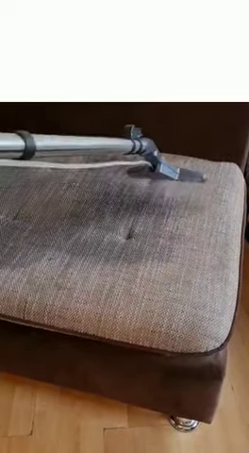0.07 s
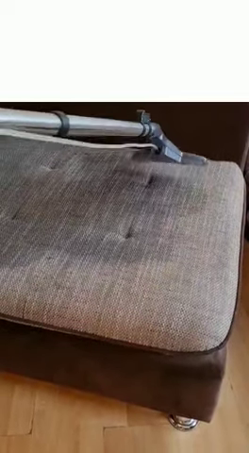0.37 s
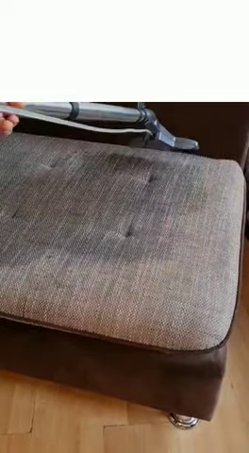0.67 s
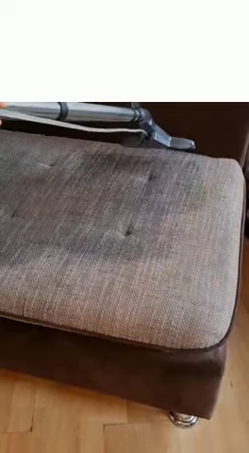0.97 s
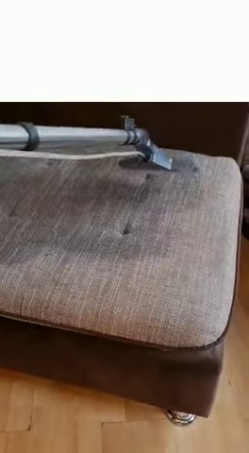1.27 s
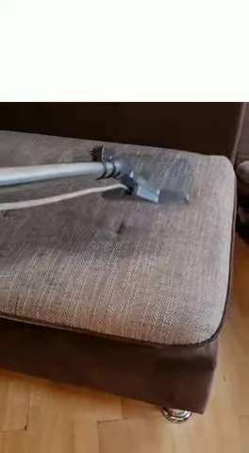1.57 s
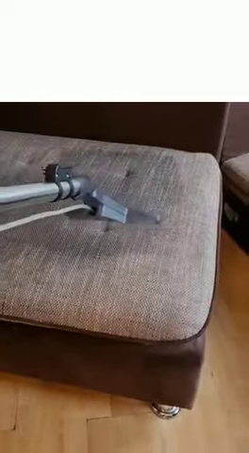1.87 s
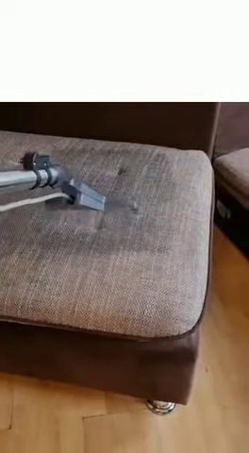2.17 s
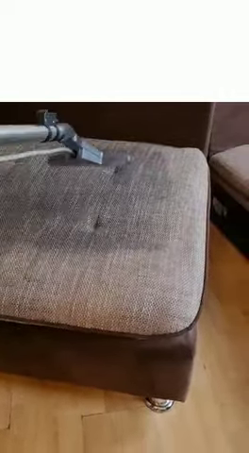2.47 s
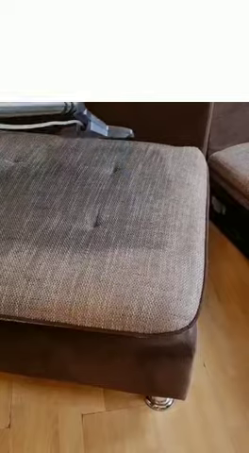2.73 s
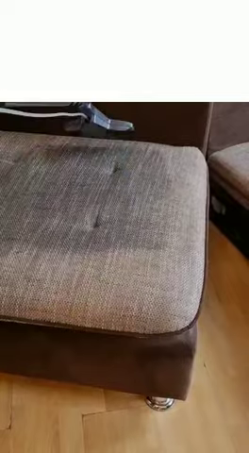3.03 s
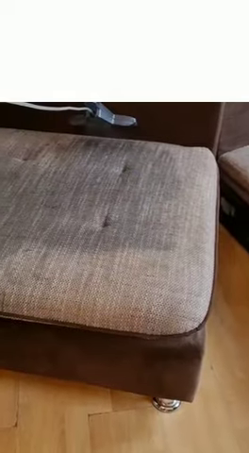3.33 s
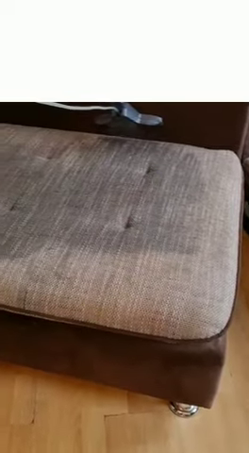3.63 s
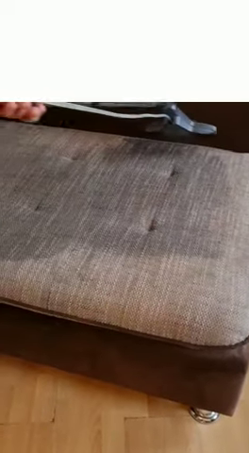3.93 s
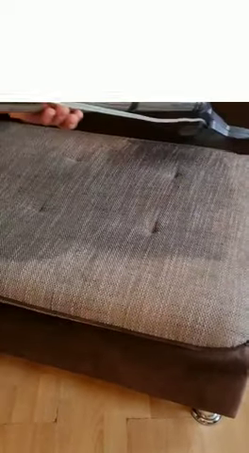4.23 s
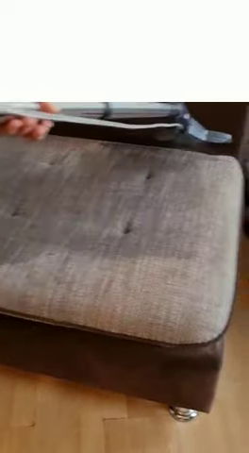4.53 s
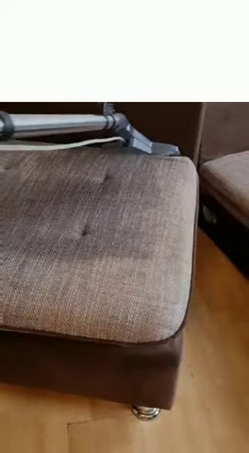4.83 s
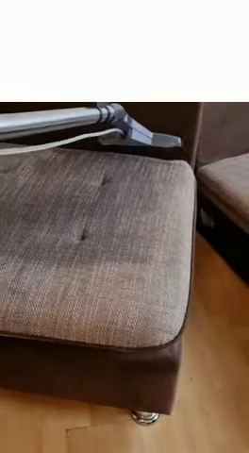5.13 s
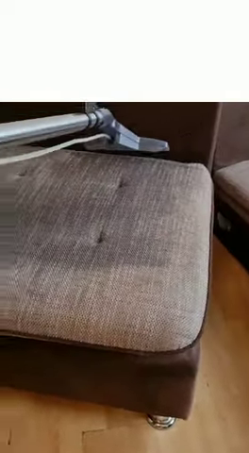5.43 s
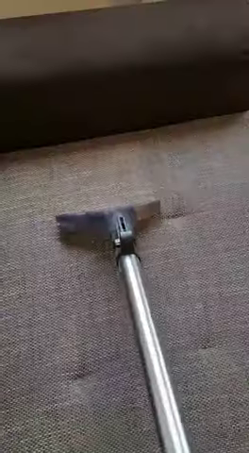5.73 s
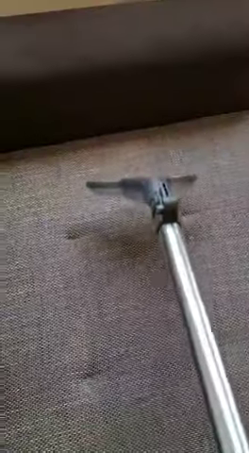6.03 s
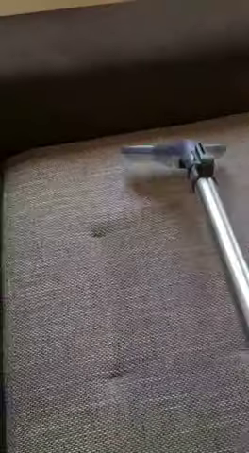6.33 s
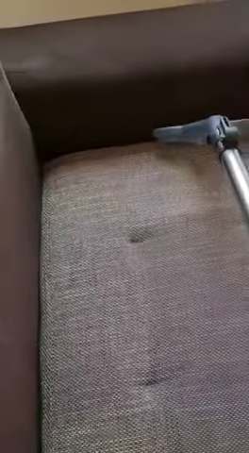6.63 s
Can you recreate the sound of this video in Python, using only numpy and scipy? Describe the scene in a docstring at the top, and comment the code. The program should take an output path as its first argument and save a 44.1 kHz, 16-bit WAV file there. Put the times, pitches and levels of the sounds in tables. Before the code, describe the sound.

A buzzing pump and hissing, spitting water spray die away, a plastic wand clicks, and louder vacuum suction starts on wet fabric.

```python
"""Wet-cleaning a sofa

A spray-extraction cleaner in a small room, heard on a pair of microphones. Its mains-driven piston
pump buzzes while the nozzle sprays and spits; the buzz dies away and the wand clicks twice, then
once faintly. After an instant of silence the suction motor is running: it whines, sags in speed as
the nozzle grips, and draws air through the wet fabric."""
import sys
import numpy as np
from scipy import signal
from scipy.fft import rfft, irfft
from scipy.io import wavfile

SR = 44100
rng = np.random.default_rng(int(sys.argv[2]) if len(sys.argv) > 2 else 0)


def dump_mix(stems):
    """Bounce the given channels to the path in sys.argv[1] as a 16-bit WAV at rate SR."""
    frames = np.atleast_2d(stems).T  # one column per channel
    limited = np.clip(frames, -1, 1)  # hard clip at full scale
    pcm = np.round(limited * 32767).astype(np.int16)
    wavfile.write(sys.argv[1], SR, pcm)


N = 299880
TIME, BINS = np.arange(N) / SR, np.fft.rfftfreq(N, 1 / SR)
MAINS_HZ = 50.015  # one piston stroke a cycle
SPRAY_OFF_S, PUMP_OFF_S = 4.995, 5.025  # the spray loses its pressure first

# Water rushing in hose and nozzle. Each row: frequency in Hz, relative density in dB.
FLOW = [(15, -60), (25, -27), (45, -21), (70, -19), (110, -16), (160, -17.5), (220, -13.5), (400, -15.5),
        (560, -16.5), (900, -18.5), (1500, -16), (2700, -18), (3400, -15.5), (3800, -19), (4500, -30.5),
        (5850, -69), (9900, -110)]
# Mist leaving the nozzle. Each row: frequency in Hz, relative density in dB.
MIST = [(2530, -15.5), (4300, -4), (5810, -2), (6500, 1), (7040, 1), (7930, 2.5), (10900, -5.5),
        (13800, -5), (14600, -17), (15500, -20)]
# Large air bubbles spat from the nozzle. Each row: start in seconds, level in dB.
SPITS = [(0.7272, -32.5), (0.9677, -35), (1.2271, -37), (2.0517, -30.5), (2.1124, -23.5), (2.1254, -36),
         (2.6973, -33), (3.0174, -33), (3.1906, -39), (3.3483, -38), (3.6331, -35), (3.7105, -38),
         (4.3535, -40)]
# How alike the two microphones hear the room. Each row: frequency in Hz, correlation.
COHERENCE = [(60, 1), (110, .997), (200, .86), (300, .7), (640, .2), (1410, -.28), (3100, .12), (6820, 0),
             (15000, 0)]
# Stereo balance while spraying. Each row: frequency in Hz, left minus right in dB.
SPRAY_BALANCE = [(60, -2), (110, 3.5), (200, 3), (380, -5.5), (700, -0.5), (1290, -4.5), (2380, -3),
                 (4400, 0), (8120, 0.5), (15000, -1.5)]


def pump(strokes):
    """The piston shakes the housing: throb, hum, a higher drone, buzzing panels and an uneven rattle."""
    # Pump harmonics. Each row: multiple of the stroke rate, relative level left and right in dB.
    harmonics = [(1, -70, -75), (2, -39.5, -39.0), (3, -61, -64.5), (4, -48.5, -49.5), (5, -54.5, -48.5),
                 (6, -54, -47), (7, -66.5, -55.5), (8, -51, -48), (9, -76, -74), (10, -50.5, -47.5),
                 (11, -49, -43.5), (12, -45.5, -49), (13, -53.5, -53), (14, -73, -54.5), (15, -67, -51),
                 (16, -53, -55.5)]
    # Panels buzzing on the nearest harmonic. Each row: pitch in Hz, relative level left and right in dB.
    panel_modes = [(850, -55, -72), (1000, -54, -53), (1050, -61, -55.5), (1100, -76, -64),
                   (1250, -66, -68), (1300, -60, -54), (1400, -58, -60), (1500, -55, -54.5),
                   (1550, -51.5, -53), (1600, -53.5, -52), (1650, -59, -59), (1700, -62, -66),
                   (2050, -73, -55), (2150, -65, -62), (2300, -56.5, -58.5), (2350, -68, -60),
                   (2950, -63, -56), (3000, -61, -59), (3104, -68, -56), (3290, -76, -56), (3337, -54, -52),
                   (3649, -66, -62), (3699, -58.5, -53.5)]
    # The piston's rattle. Each row: frequency in Hz, relative level in dB.
    rattle_spectrum = [(800, 8), (1100, -7), (1600, -9), (2200, 3), (2650, -5.5), (3300, 4), (3750, -7.5),
                       (4000, -12), (4500, -17), (6600, -10.5), (8000, -21), (9000, -19)]
    orders, sides_db = np.arange(len(harmonics)) + 1, np.transpose(harmonics)[1:]
    low, high = orders <= 2, orders >= 9
    mid = ~low & ~high
    throb = stroke_tones(strokes, orders[low], sides_db[:, low], strike=0.675, scatter=0, wander=0)
    hum = stroke_tones(strokes, orders[mid], sides_db[:, mid], strike=0.5994, scatter=1, wander=0.017)
    drone = stroke_tones(strokes, orders[high], sides_db[:, high], strike=.75, scatter=1.37, wander=0.22)
    panel_hz, *panel_db = np.transpose(panel_modes)
    panel_orders = np.round(panel_hz / MAINS_HZ).astype(int)
    panels = stroke_tones(strokes, panel_orders, panel_db, strike=.5, scatter=0.47, wander=0.12)
    rattle_orders = np.setdiff1d(np.arange(len(harmonics) + 1, 180), panel_orders)
    rattle_db = at_hz(rattle_spectrum, rattle_orders * MAINS_HZ)
    jittered = strokes + 0.00059 * drift(hz=40)
    rattle = stroke_tones(jittered, rattle_orders, rattle_db, strike=.36, scatter=0.66, wander=0.21)
    drone += gain_of(-8.5) * valve_chatter()
    swell_db = 2 * np.exp(-((TIME - 4.07) / 0.41) ** 2)
    return (run_down(db=-38.5 + .3 * drift(hz=1.2), t60=.28) * throb
            + run_down(db=-42, t60=0.35) * hum
            + run_down(db=-46 + swell_db, t60=0.55) * drone
            + run_down(db=-47.5 + 0.41 * drift(hz=12), t60=0.35) * panels
            + run_down(db=-52 + drift(hz=25), t60=0.3) * rattle)


def stroke_tones(strokes, orders, level_db, strike, scatter, wander):
    """Harmonics of one blow a stroke, `strike` of the way through; reflections scatter the upper ones."""
    size = 4096  # samples in one cycle
    reflected = np.log(np.maximum(orders / 2, 1))
    mic_angle = np.arccos(at_hz(COHERENCE, orders * MAINS_HZ)) * rng.choice([-1, 1], len(orders))
    phase = scatter * reflected * rng.standard_normal(len(orders)) + np.outer([.5, -.5], mic_angle)
    direct = np.exp(1j * (phase - 2 * np.pi * orders * strike))
    blend = drift(hz=0.53)  # one set of reflections gives way to another as the microphones move
    echoes = reflected * np.exp(2j * np.pi * rng.random((2, 2, len(orders))))
    paths = [(direct, 1), (echoes[0], wander * np.cos(blend)), (echoes[1], wander * np.sin(blend))]
    tones = np.zeros((2, N))
    for path, weight in paths:
        lines = np.zeros((2, size // 2 + 1), complex)
        lines[:, orders] = gain_of(level_db) * path
        for channel, cycle in zip(tones, irfft(lines)):
            channel += weight * np.interp(strokes % 1 * size, np.arange(size), cycle)
    return unit_rms(tones)


def valve_chatter():
    """The valve chatters on every other stroke, sounding between the pump's harmonics."""
    # Valve tones. Each row: pitch in Hz, relative level in dB.
    partials = [(225, -66), (475, -61.5), (525, -68), (675, -70), (725, -61.5), (775, -71.5), (1125, -67.5),
                (1175, -66)]
    chatter = np.zeros((2, N))
    for hz, db in partials:
        level = gain_of(db + 0.96 * drift(hz=3.6))
        chatter += level * np.cos(2 * np.pi * hz * TIME + rng.normal(0, 1, (2, 1)))
    return unit_rms(chatter)


def spray(strokes):
    """Each stroke pushes two surges of water through the hose and out as mist and droplets."""
    # Spray strength as the nozzle moves. Each row: time in seconds, dB above the usual.
    strength = [(0.1, -0.1), (1.4, 0), (1.85, -1.8), (2.2, 1.3), (3.0, 1.1), (3.4, -2), (4.0, -0.3),
                (4.8, -1)]
    # Hollow tones of the jet. Each row: pitch in Hz, level in dB.
    jet_tones = [(1320, -59), (1590, -57.5), (2200, -56.5)]
    push_db, = curves(strength)
    long_surge = 0.83 * np.exp(-((strokes - .34) % 1) / 0.1)
    short_surge = 0.52 * np.exp(-((strokes - .66) % 1) / 0.017)
    flow = run_down(db=-46.5 + 0.35 * push_db, t60=0.51) * noise(at_hz(FLOW, BINS), SPRAY_BALANCE)
    for hz, db in jet_tones:
        jet = noise(-130 * np.log2((BINS + 1) / hz) ** 2, SPRAY_BALANCE)
        flow += run_down(db + 1.5 * (push_db + drift(hz=6.8)), t60=0.51) * jet
    mist_gain = run_down(db=-52.5 + push_db, t60=0.26, off_s=SPRAY_OFF_S)
    mist = mist_gain * noise(at_hz(MIST, BINS), SPRAY_BALANCE)
    # every spit leaves a sputter of droplets on top of the steady fizz
    sputter_power = sum((TIME > s) * run_down(db - 25, t60=.6, off_s=s) ** 2 for s, db in SPITS)
    fizz_gain = run_down(db=-57.5 + 1.7 * push_db, t60=0.26, off_s=SPRAY_OFF_S)
    drops = droplets(1200, spread_db=3.5, spectrum=[(8000, -20), (11000, -10), (13500, 3), (15500, -3)])
    fizz = np.sqrt(fizz_gain ** 2 + sputter_power) * drops
    return unit_rms(1 + long_surge + short_surge) * (flow + mist + fizz)


def motor(load):
    """Shaft unbalance and fan whine, both sagging under load, over a hum at twice the mains rate."""
    # The two tones swell and fade. Each row: time in seconds, shaft level in dB, whine level in dB.
    levels = [(5.7, -32.5, -28.5), (5.85, -32, -33.5), (6.0, -31, -35), (6.1, -47, -33), (6.22, -43, -38),
              (6.33, -32, -35.5), (6.5, -31.5, -34.5), (6.6, -37.5, -45), (6.8, -30, -38)]
    free_hz, sag_hz, blades = 407.5, 23.5, 6
    shaft_db, whine_db = curves(levels)
    shaft_hz = (free_hz - sag_hz * load) * (1 + 0.001 * drift(hz=30.2))
    angle = 2 * np.pi * np.cumsum(shaft_hz) / SR
    shaft = gain_of(shaft_db + 0.69 * drift(hz=9.1) + [[-.5], [.5]]) * np.sin(angle)
    whine = np.array([gain_of(whine_db + 2.8 * drift(hz=14))
                      * np.sin(blades * angle + rng.normal(0, 0.27)) for _ in range(2)])
    hum = gain_of(-52) * np.sin(2 * np.pi * 2 * MAINS_HZ * TIME)
    return np.sqrt(2) * (shaft + whine + hum)


def suction(load):
    """Turbulent air roars in the tank and hose, and tears water out of the fabric at the slot."""
    # Air in tank and hose. Each row: frequency in Hz, relative density in dB.
    roar_spectrum = [(15, -55), (28, -36), (60, -27), (85, -25), (110, -17), (150, -21), (213, -10.5),
                     (355, -13.5), (400, -7), (470, -9), (620, -5.5), (780, -6), (1120, -11.5),
                     (2070, -12.5), (2400, -11.5), (2670, -14), (4000, -20.5), (5200, -47), (8800, -110)]
    # Air at the nozzle slot. Each row: frequency in Hz, relative density in dB.
    hiss_spectrum = [(2060, -22), (3500, -3), (3890, -1), (4990, -4), (6130, -3.5), (7430, -7), (13000, -8),
                     (14600, -10.5), (15500, -19)]
    # Resonances of tank and hose. Each row: centre in Hz, width in Hz, lift in dB.
    resonances = [(220, 25, 0.5), (335, 5.9, 10), (446, 4.8, 12), (537.6, 10.4, 7), (634, 16, 3.5),
                  (662, 13, 4), (915, 6.6, -8), (1400, 86, 5), (1514, 28, 4), (2300, 150, -3),
                  (3107, 145, 10), (3760, 150, -3)]
    # Stereo balance of the suction. Each row: frequency in Hz, left minus right in dB.
    balance = [(60, -6), (110, -4), (200, 0.5), (380, -2.5), (700, -1.5), (1290, -3), (2380, 1),
               (4400, -1.5), (8120, 1.5), (15000, -1)]
    slurp_s, rise_s, fall_s = 5.82, 0.051, 0.25  # the first slurp of water lifts the hiss
    slurp = np.exp(-abs(TIME - slurp_s) / np.where(TIME < slurp_s, rise_s, fall_s))
    flutter = drift(hz=45)
    roar_db = -21.5 - 1.5 * load + 0.25 * flutter
    slot_db = -34.5 + 2.1 * load + 5 * slurp + 0.34 * flutter
    lift_db = sum(db / (1 + (2 * (BINS - hz) / width) ** 2) for hz, width, db in resonances)
    roar = noise(at_hz(roar_spectrum, BINS) + lift_db, balance)
    hiss = gain_of(3) * noise(at_hz(hiss_spectrum, BINS), balance)
    water = gain_of(-4) * droplets(per_s=2300, spread_db=1, spectrum=hiss_spectrum)
    return gain_of(roar_db) * roar + gain_of(slot_db) * (hiss + water)


def spits():
    """Large air bubbles crack at the nozzle."""
    cracks = np.zeros((2, N))
    for s, db in SPITS:
        add(cracks, s, gain_of(db + 0.5) * burst(hz=13700, octaves=0.47, t60=0.01))
    return room(cracks, t60=.25, wet_db=-3.5)


def bubbles(per_s=11):
    """Small bubbles tick at random while the spray runs."""
    ticks = np.zeros((2, N))
    for when, size in rng.random((round(per_s * SPRAY_OFF_S), 2)):
        add(ticks, when * SPRAY_OFF_S, gain_of(-50 + 8 * size) * burst(hz=13500, octaves=0.22, t60=0.013))
    return room(ticks, t60=.25, wet_db=-7)


def wand():
    """The plastic wand bumps in the hand, rings briefly at each click and rubs from the first click on."""
    # Soft bumps. Each row: start in seconds, level in dB, centre in Hz, width in octaves, t60 in seconds.
    bumps = [(0.808, -41.5, 104, 0.4, 0.15), (0.817, -40, 398, 1.1, 0.12), (0.854, -36, 560, .5, 0.053)]
    # Clicks. Each row: start in seconds, peak in dB, hardness in dB per octave.
    clicks = [(5.4321, -34.5, -5.5), (5.555, -26, 6), (5.604, -42.5, 5)]
    # The wand's modes. Each row: pitch in Hz, relative level in dB, t60 in seconds.
    modes = [(684, -8.5, 0.026), (1300, 2.5, 0.016), (2430, 0, 0.02), (4700, 0.5, 0.016), (6750, -3, 0.011),
             (13000, -21, .012)]
    knocks = np.zeros((2, N))
    for s, db, hz, octaves, t60 in bumps:
        add(knocks, s, gain_of(db) * burst(hz, octaves, t60))
    for s, db, hardness in clicks:
        ring = sum(gain_of(mode_db + hardness * np.log2(hz / 2000)) * burst(hz, octaves=0.25, t60=t60)
                   for hz, mode_db, t60 in modes)
        add(knocks, s, gain_of(db) * ring / abs(ring).max())
    rub = (TIME > clicks[0][0]) * gain_of(-65) * noise(at_hz(FLOW, BINS), SPRAY_BALANCE)
    return room(knocks, t60=0.27, wet_db=-8.5) + rub


def room_tone():
    """The quiet room: a low murmur, a faint hiss and a faint steady tone."""
    # The room's murmur. Each row: frequency in Hz, relative density in dB.
    murmur_spectrum = [(35, -51), (60, -4), (103, -5), (168, -21), (241, -1), (279, -12), (400, 0),
                       (430, -12), (570, -2), (739, -28), (1550, -15), (3690, -31), (4500, -48),
                       (5850, -75), (9900, -120)]
    murmur = gain_of(-66.5) * noise(at_hz(murmur_spectrum, BINS), SPRAY_BALANCE)
    hiss = gain_of(-91) * noise(at_hz(MIST, BINS), SPRAY_BALANCE)
    tone = gain_of(-72 + 1.2 * drift(hz=8)) * np.sqrt(2) * np.sin(2 * np.pi * 550 * TIME)
    return murmur + hiss + tone


def room(x, t60, wet_db):
    """The small room adds a short diffuse tail, different at each microphone."""
    t = np.arange(SR // 2) / SR
    tail = rng.standard_normal((2, len(t))) * gain_of(-60 * t / t60)
    return x + gain_of(wet_db) * signal.fftconvolve(x, tail / np.linalg.norm(tail[0]), axes=1)[:, :N]


def mic_pair(samples):
    """Left and right spectra of white noise, as alike as the two microphones hear it."""
    left, other = rfft(rng.standard_normal((2, samples)))
    alike = at_hz(COHERENCE, np.fft.rfftfreq(samples, 1 / SR))
    return np.array([left, alike * left + np.sqrt(1 - alike ** 2) * other])


def noise(spectrum_db, balance):
    """Steady coloured noise at the two microphones."""
    sides_db = np.outer([.5, -.5], at_hz(balance, BINS))
    return unit_rms(irfft(mic_pair(N) * gain_of(spectrum_db + sides_db)))


def burst(hz, octaves, t60):
    """A blow: noise around one pitch that rises at once and dies away."""
    t = np.arange(SR // 4) / SR
    bins = np.fft.rfftfreq(len(t), 1 / SR)
    band = np.exp(-.5 * (np.log2((bins + 1) / hz) / octaves) ** 2)
    envelope = gain_of(-60 * t / t60) * (1 - np.exp(-t / 0.00016))
    return envelope * unit_rms(irfft(band * mic_pair(len(t)), len(t)))


def droplets(per_s, spread_db, spectrum):
    """Tiny bursts of water at random moments, a few of them large."""
    sizes = gain_of(spread_db * np.minimum(rng.exponential(1, (2, N)), 4)) * rng.choice([-1, 1], (2, N))
    impacts = sizes * (rng.random((2, N)) < per_s / SR)
    return unit_rms(irfft(rfft(impacts) * gain_of(at_hz(spectrum, BINS))))


def run_down(db, t60, off_s=PUMP_OFF_S):
    """A gain that follows db until off_s, then falls 60 dB every t60 seconds."""
    return gain_of(db - 60 * np.maximum(TIME - off_s, 0) / t60)


def drift(hz):
    """Random wander of unit size, up to the given rate."""
    return unit_rms(irfft(rfft(rng.standard_normal(N)) / (1 + (BINS / hz) ** 4), N))


def gain_of(db):
    """Decibels to amplitude."""
    return 10 ** (np.asarray(db) / 20)


def unit_rms(x):
    """Scales to an rms of one."""
    return x / np.sqrt(np.mean(x ** 2) + 1e-20)


def at_hz(rows, hz):
    """Reads a table along a log-frequency axis."""
    row_hz, values = np.transpose(rows)
    return np.interp(np.log(hz + 1), np.log(row_hz + 1), values)


def curves(rows):
    """Each column of a time table, sample by sample."""
    s, *columns = np.transpose(rows)
    return [np.interp(TIME, s, column) for column in columns]


def add(mix, s, sound):
    """Mixes a stereo sound in at s seconds."""
    part = mix[:, round(s * SR):][:, :sound.shape[1]]
    part += sound[:, :part.shape[1]]


def scene():
    """First spraying, then an instant of silence, then suction."""
    silence_s, motor_on_s = 5.609, 5.699
    grip_s, sag_s = 5.885, .262  # the load builds once the nozzle grips the fabric
    strokes = MAINS_HZ * TIME + 0.00059 * drift(hz=1.1)
    load = 1 - np.exp(-np.maximum(TIME - grip_s, 0) / sag_s)
    sucking = motor(load) + suction(load)
    spraying = pump(strokes) + spray(strokes) + spits() + bubbles() + wand() + room_tone()
    fade_out = gain_of(-np.clip((TIME - silence_s) * 1700, 0, 50))  # 50 dB down in about 30 ms
    fade_in = np.clip((TIME - motor_on_s) / .001, 0, 1)
    return fade_out * spraying + fade_in * sucking


def record(dry):
    """The recorder passes nothing much above 15.75 kHz."""
    lowpass = signal.firwin(511, 15750, window=("kaiser", 9), fs=SR)
    return signal.oaconvolve(dry, lowpass[None], "same")


dry = scene()
out = record(dry)
dump_mix(out)
```